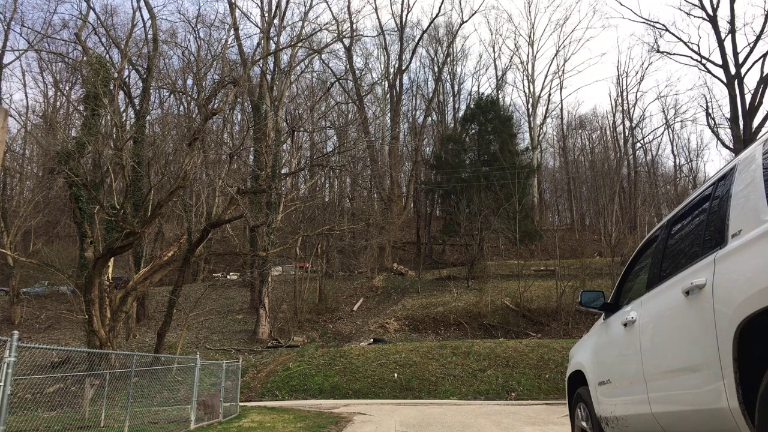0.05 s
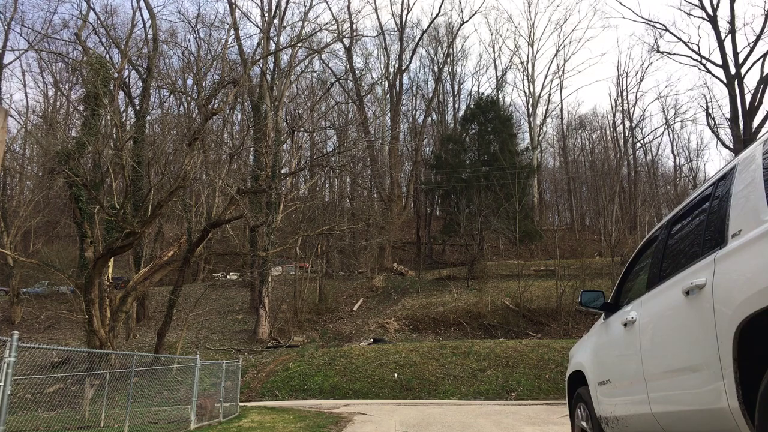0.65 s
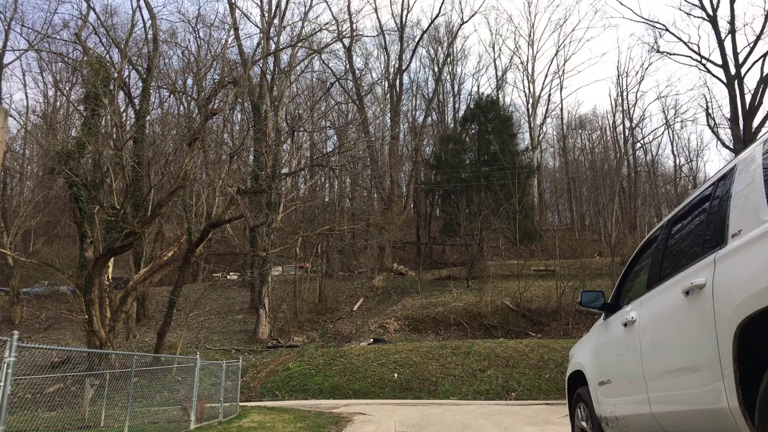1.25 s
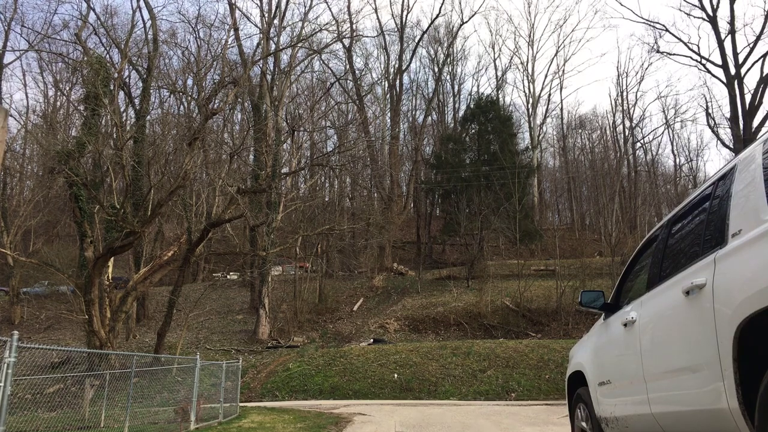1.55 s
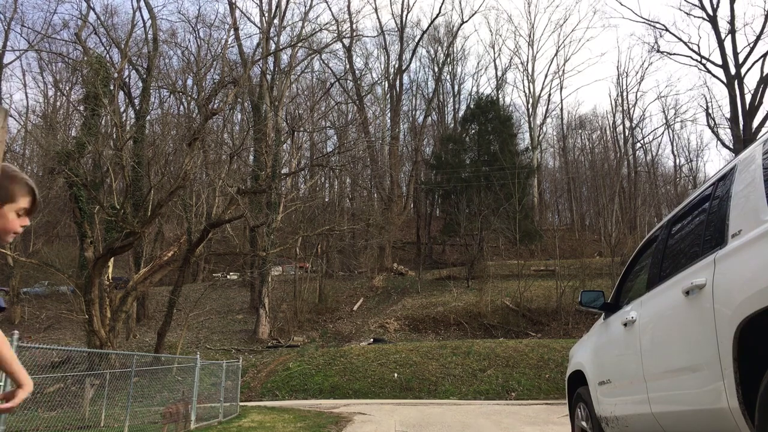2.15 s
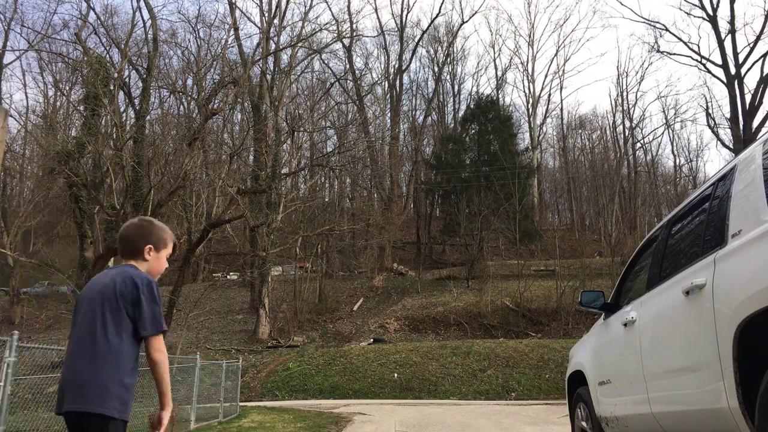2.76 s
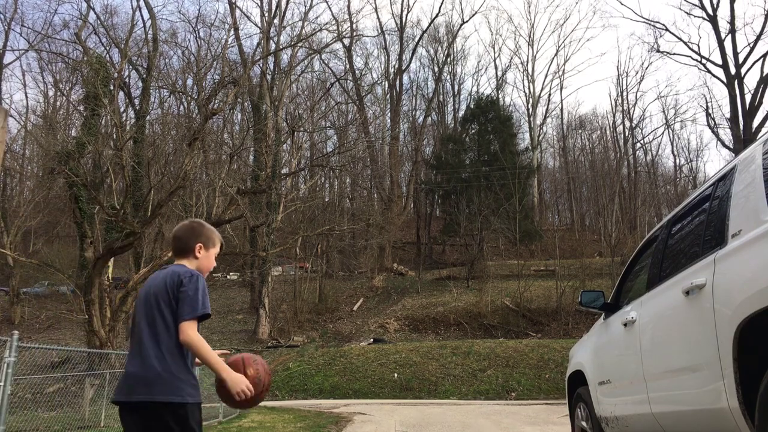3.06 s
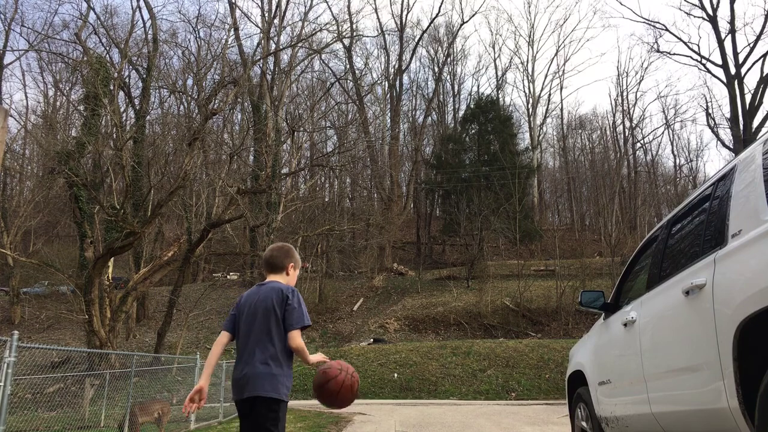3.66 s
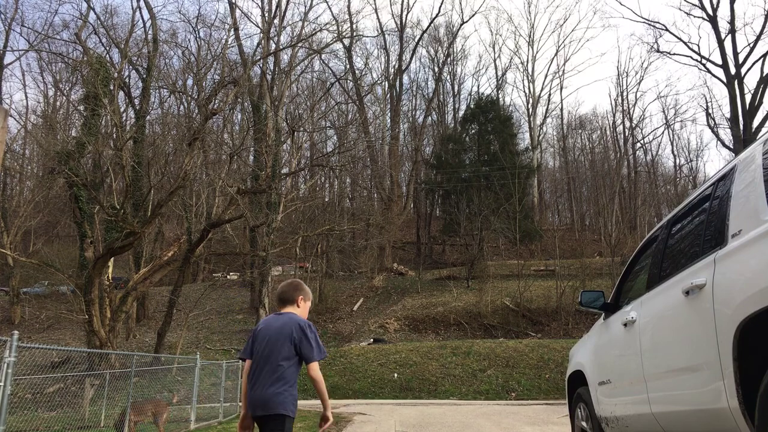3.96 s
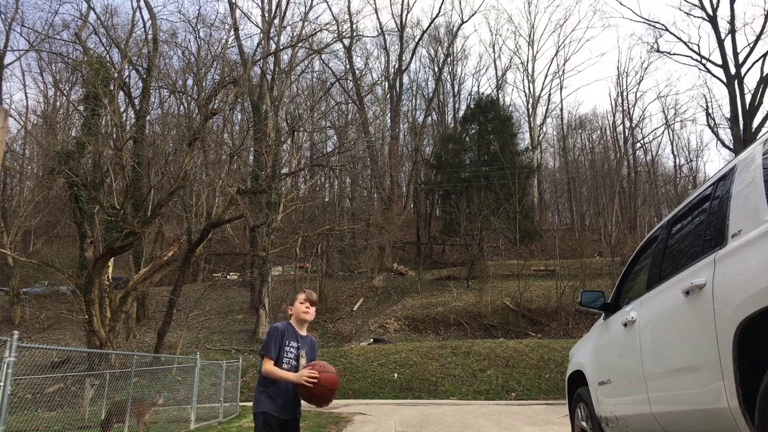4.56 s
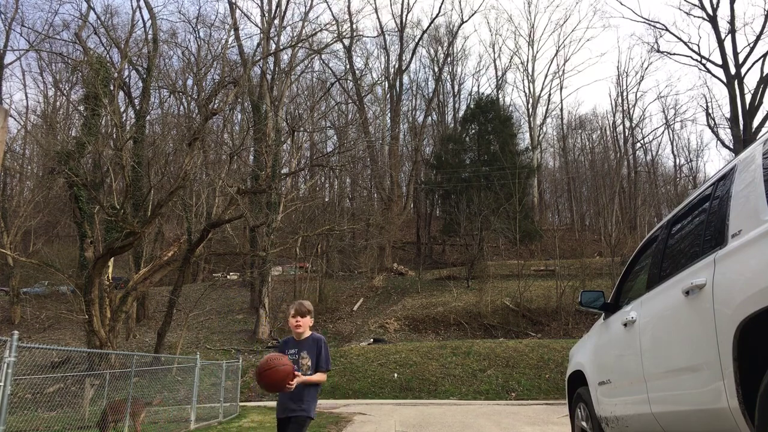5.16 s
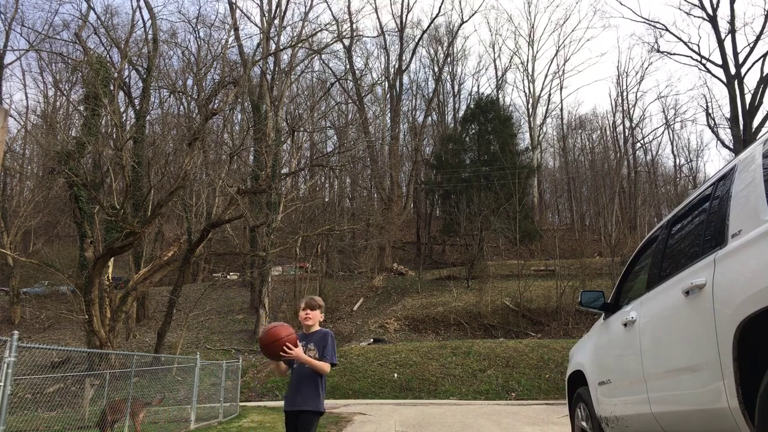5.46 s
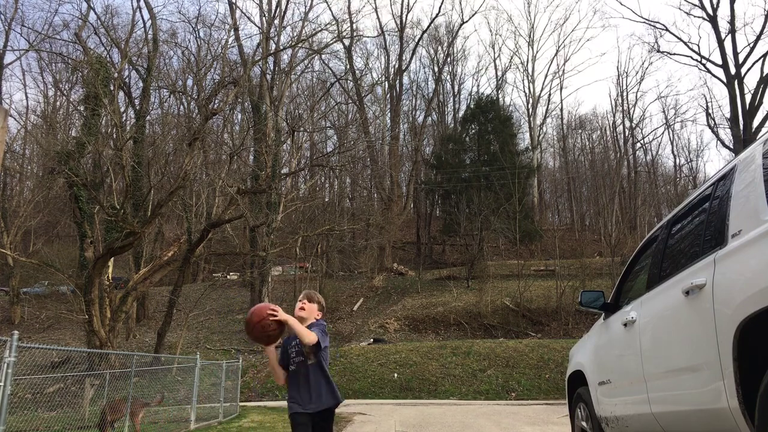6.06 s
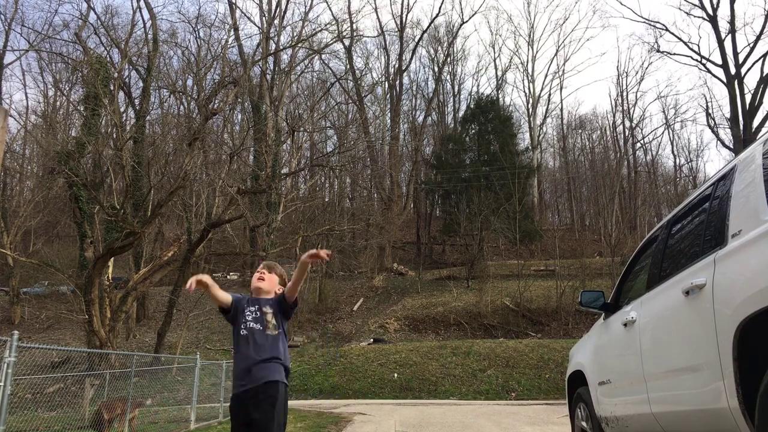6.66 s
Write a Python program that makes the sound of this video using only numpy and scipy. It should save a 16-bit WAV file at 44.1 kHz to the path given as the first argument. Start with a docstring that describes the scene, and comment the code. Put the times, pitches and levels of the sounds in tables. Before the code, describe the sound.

A basketball bounces six times on concrete outdoors, followed by faint shoe scuffs, with three loud microphone bumps over distant traffic.

```python
"""A basketball is dribbled up a concrete driveway, caught and shot, heard on one microphone in the yard.
Each bounce slaps the ground, rings the air inside and flexes the shell; a parked car, fence and house
throw it back. Shoes scuff and hands brush the ball. Far traffic hums under a hiss that comes and goes,
with faint chirps and ticks. Three times the microphone is bumped: a light touch and crackle around
a pop that falls into a deep thud."""
import sys
import numpy as np
from scipy import signal
from scipy.fft import rfft, irfft, next_fast_len
from scipy.io import wavfile
from scipy.ndimage import map_coordinates

SR = 44100
rng = np.random.default_rng(int(sys.argv[2]) if len(sys.argv) > 2 else 0)


def digitize_waveform(pressure):
    """Quantize a signal to 16-bit integers and store it at the path in sys.argv[1].

    Rows of a 2-D input are taken as channels; values are limited to [-1, 1].
    """
    field = np.atleast_2d(pressure).T
    bounded = np.clip(field, -1, 1)
    quanta = np.round(bounded * 32767).astype(np.int16)
    wavfile.write(sys.argv[1], SR, quanta)


N = 300762
TIME = np.arange(N) / SR

# bumps on the microphone: time_s, pop_db, thud_vs_pop_db, softness_s, touch_ahead_s, touch_db,
# crackle_ahead_s, crackle_length_s, crackle_db, hiss_dip_db, traffic_dip_db
BUMPS = [(2.2647, -4.5, 0, 0.0053, .0128, -9.5, 0.0037, 0.0056, -10.5, 8.5, -1),
         (6.357, -.5, -2.5, .000092, 0.0045, -11, .0125, .011, -22, 3.5, 14),
         (6.7566, 1.5, -10.5, 0.000094, .0051, -8.5, .0045, .01, -17, 7.5, 1.5)]


def amp(db):
    """Decibels to gain."""
    return 10 ** (np.asarray(db) / 20)


def unit(x):
    """x at rms 1."""
    return x / np.sqrt(np.mean(x ** 2) + 1e-20)


def along(points, hz):
    """(frequency_hz, value) points read on a log axis."""
    knots_hz, values = np.transpose(points)
    return np.interp(np.log(hz + 1), np.log(knots_hz + 1), values)


def add(track, start_s, x):
    """Mix x into the track from start_s on."""
    part = track[max(round(start_s * SR), 0):][:len(x)]
    part += x[:len(part)]


def filtered(x, response):
    """x shaped by a gain that depends on frequency."""
    size = next_fast_len(len(x) + 8192)
    return irfft(rfft(x, size) * response(np.fft.rfftfreq(size, 1 / SR)), size)[:len(x)]


def dull(x, cut_hz):
    """Second-order low-pass."""
    return signal.lfilter(*signal.butter(2, cut_hz, fs=SR), x)


def resonate(x, pitch_hz, width):
    """x through one steep resonance, at rms 1; width is a share of the pitch."""
    peak = signal.iirpeak(pitch_hz, 1 / width, fs=SR)
    return unit(signal.lfilter(*peak, signal.lfilter(*peak, x)))


def wobble(rate_hz):
    """A smooth random curve with rate_hz knots a second."""
    return map_coordinates(rng.standard_normal(int(N * rate_hz / SR) + 4), [TIME * rate_hz])


def noise(spectrum, size=N):
    """Coloured noise at rms 1."""
    return unit(filtered(rng.standard_normal(size), lambda hz: amp(along(spectrum, hz))))


def grains(spectrum, spread_db):
    """Dense tiny clicks of unequal size, at rms 1."""
    clicks = rng.standard_normal(N) * amp(spread_db * np.clip(rng.standard_normal(N), -2, 2))
    return unit(filtered(clicks, lambda hz: amp(along(spectrum, hz))))


def swell(peak_s, rise_s, fall_s):
    """An envelope that grows to 1 at peak_s and dies away."""
    return np.exp(-np.minimum(np.maximum((peak_s - TIME) / rise_s, (TIME - peak_s) / fall_s), 20))


def held(start_s, end_s, rise_s, fall_s):
    """An envelope that rises to 1 by start_s, holds until end_s and dies away."""
    return swell(np.clip(TIME, start_s, end_s), rise_s, fall_s)


def stroke(t, length_s, rise_share=.35):
    """The envelope of one rub: it presses on until t = 0, then lets go."""
    return np.exp(-np.minimum(np.maximum(-t / rise_share, t / (1 - rise_share)) / length_s, 20))


def dip(start_s, depth_db, recover_s, sink_s=0.028):
    """A gain that sinks just after start_s, stays low and comes back to 1."""
    age = np.maximum(TIME - start_s, 0)
    return amp(-depth_db * np.minimum(age / sink_s, 1) * np.exp(-(age / recover_s) ** 3))


def hiss():
    """A smooth hiss that comes in spells over a faint floor and dips after each bump."""
    hiss_spells = [(-1, 2.74), (6, 8)]  # when it is up: start_s, end_s
    hiss_colour = [(500, 1.5), (1500, 0), (3000, -5.5), (5500, -9.5), (8000, -13), (9600, -14.5),
                   (10400, -21.5), (11300, -16), (15500, -23.5)]  # its spectrum: frequency_hz, density_db
    floor_db, spell_db = -80.5, -54
    spells = sum(held(start, end, rise_s=0.02, fall_s=0.017) for start, end in hiss_spells)
    dips = np.prod([dip(time_s, depth_db, recover_s=0.5) for time_s, *_, depth_db, _ in BUMPS], axis=0)
    return (amp(floor_db) + amp(spell_db) * spells * dips) * noise(hiss_colour)


def traffic():
    """Far roads: rumble and tyre roar with one passing car; the level dips deeply at the second bump."""
    road_colour = [(20, -34.5), (40, -9), (80, 1.5), (112, -4.5), (207, -14), (354, -10), (430, -15),
                   (1100, -8.5), (1300, -15), (1750, -14.5), (2100, -29), (2700, -31), (3100, -42.5),
                   (15000, -67.5)]  # rumble of distant roads and town: frequency_hz, density_db
    tyre_colour = [(150, -56), (500, -15.5), (800, 2.5), (1000, 16.5), (1250, 2), (2000, -35),
                   (3200, -54.5)]  # tyre roar: frequency_hz, density_db
    step_s, ramp_s, fade_db_per_s = 2.37, .4, 0.48
    step = np.clip((TIME - step_s) / ramp_s + .5, 0, 1)
    fade_db = fade_db_per_s * np.maximum(TIME - step_s, 0)
    rumble_db = -51.5 + 6 * step - fade_db  # steps up once, then slowly draws away
    rumble = amp(rumble_db + 0.51 * wobble(9)) * noise(road_colour)
    steady_roar = amp(-54.5) * (1 - step) + amp(-60.5) * step
    passing_car = amp(-49.5) * swell(peak_s=2.85, rise_s=0.63, fall_s=0.16)
    tyres = np.hypot(steady_roar, passing_car) * amp(0.87 * wobble(3.3)) * noise(tyre_colour)
    dips = np.prod([dip(time_s, depth_db, recover_s=.27) for time_s, *_, depth_db in BUMPS], axis=0)
    return (rumble + tyres) * dips


def chirps():
    """Thin unsteady notes, far off, that barely rise over the hiss."""
    notes = [(1.265, 4500, -56, 0.012), (6.423, 4400, -59, 0.02), (6.69, 5300, -50, .002)]  # faint chirps: time_s, pitch_hz, level_db, half_length_s
    flutter = 1.6 * wobble(700)
    return sum(amp(db) * np.exp(-((TIME - time_s) / half_s) ** 2) * np.sin(2 * np.pi * hz * TIME + flutter)
               for time_s, hz, db, half_s in notes)


def ticks(count, first_s=.386, every_s=.394):
    """Tiny dry clicks at an even pace, all treble."""
    beats = sum(swell(first_s + k * every_s, rise_s=.0003, fall_s=.001) for k in range(count))
    return amp(-50) * beats * noise([(1500, -30), (5000, 4), (14000, -6.5)])


def pop(thud_db, life_s, softness_s):
    """A click that glides down to the microphone's lowest resonance."""
    thud_hz, glide_cycles = 31.6, 0.41
    t = np.arange(SR // 8) / SR
    cycles = thud_hz * t + glide_cycles * np.log1p(t / softness_s)  # a harder contact starts higher
    envelope = amp(thud_db * (1 - np.exp(-t / 0.0018))) * np.exp(-(t / life_s) ** 2)
    return envelope * np.cos(2 * np.pi * cycles)


def microphone_bumps():
    """Light rubs, and bumps, each a light touch and crackle around a pop that falls into a thud."""
    rubs = [(2.276, -31.5, 0.023), (6.243, -37, .003), (6.291, -46.5, 0.097)]  # light rubbing on the microphone: time_s, level_db, length_s
    rub_colour = [(60, -5), (300, 0.5), (750, 5), (1300, -2), (2600, -6.5), (4500, -15.5), (7000, -21.5),
                  (8500, -27), (15000, -34)]  # spectrum of that friction: frequency_hz, density_db
    touch_life_s, thud_life_s, crackle_fall_s = 0.0041, 0.021, .0012
    pops = np.zeros(N)
    slips = unit(amp(2.7 * wobble(350)))  # light rubbing comes in tiny jerks
    friction = slips * sum(amp(db) * stroke(TIME - time_s, length_s) for time_s, db, length_s in rubs)
    for (time_s, pop_db, thud_db, softness_s, touch_ahead_s, touch_db,
         crackle_ahead_s, crackle_length_s, crackle_db, _, _) in BUMPS:
        touch_s, crackle_s = time_s - touch_ahead_s, time_s - crackle_ahead_s
        life_s = thud_life_s + softness_s  # a soft contact lasts longer
        add(pops, touch_s, amp(touch_db) * pop(thud_db=-5, life_s=touch_life_s, softness_s=0.00014))
        add(pops, time_s, amp(pop_db) * pop(thud_db, life_s, softness_s))
        lead_in = amp(-13.5) * swell(crackle_s, rise_s=0.01, fall_s=crackle_fall_s)
        crackle = held(crackle_s, crackle_s + crackle_length_s, rise_s=0.0016, fall_s=crackle_fall_s)
        friction += amp(crackle_db) * (lead_in + crackle)
        friction += amp(touch_db - 14) * stroke(TIME - touch_s, touch_life_s)
    return friction * grains(rub_colour, spread_db=2.5) + dull(pops, cut_hz=7600)


def scuffs():
    """Soles on the driveway, palms on the ball: gritty friction over a dull knock and a resonant scrape."""
    contacts = [(3.083, -60.5, -44.5, .012, 1550), (3.114, -64.5, -47.5, .04, 1100),
                (3.93, -64, -49.5, .026, 400), (4.019, -61, -47.5, .045, 352),
                (4.235, -61.5, -46, 0.13, 814), (4.302, -59.5, -66, 0.069, 2480),
                (4.369, -60, -47, .058, 330), (4.444, -53, -53, 0.012, 2500),
                (4.514, -52.5, -39.5, 0.041, 2340), (4.675, -48.5, -45, 0.015, 1520),
                (5.096, -55, -48, 0.059, 554), (5.22, -64.5, -56, 0.031, 550),
                (5.602, -55.5, -47.5, 0.045, 460), (5.739, -61.5, -57, 0.026, 554),
                (6.091, -60.5, -47.5, 0.029, 396), (6.638, -43, -38.5, 0.0072, 700),
                (6.653, -48, -36.5, 0.015, 546)]  # each scuff or brush: time_s, grit_db, knock_db, length_s, scrape_hz
    grit_colour = [(200, -28), (900, -8), (1900, -7), (2500, 14.5), (3100, 7), (4300, 9), (5200, -1.5),
                   (8200, -8), (10000, -23), (15000, -25.5)]  # spectrum of the grit: frequency_hz, density_db
    sole_colour = [(100, -37), (320, 4.5), (550, 4), (900, 0), (1600, -2), (2500, -7), (3200, -25.5),
                   (8000, -40.5)]  # spectrum of the knock: frequency_hz, density_db
    grit_envelope, body = np.zeros((2, N))
    t = np.arange(-SR // 4, SR // 4) / SR
    for time_s, grit_db, knock_db, length_s, scrape_hz in contacts:
        press = stroke(t, length_s)
        scrape = amp(-4) * resonate(rng.standard_normal(len(t)), scrape_hz, width=0.29)
        knock = noise(sole_colour, size=len(t))
        add(grit_envelope, time_s + t[0], amp(grit_db) * press)
        add(body, time_s + t[0], amp(knock_db) * press * (knock + scrape))
    stick_slip = unit(amp(2.7 * wobble(170)))
    return grit_envelope * grains(grit_colour, spread_db=9.5) * stick_slip + body


def wall_reflections(direct):
    """The direct sound plus early returns off car, fence and house; paths change as the ball moves."""
    walls = [(.0042, -5), (.0075, -11.5), (0.0126, -10), (.019, -17), (.031, -23.5)]  # nearby hard surfaces: delay_s, level_db
    out = direct.copy()
    for (delay_s, db), shift in zip(walls, rng.standard_normal(len(walls))):
        add(out, delay_s * (1 + 0.065 * shift), amp(db) * direct)
    return out


def yard_echo(x, build_s=0.0037):
    """Diffuse echo of the yard; treble dies first."""
    decay_times = [(100, 0.22), (400, 0.21), (1500, 0.14), (4000, 0.14), (12000, 0.04)]  # the yard's reverberation: frequency_hz, t60_s
    hz, t, bands = signal.stft(rng.standard_normal(len(x)), SR, nperseg=256)
    decay = amp(-60 * t / along(decay_times, hz)[:, None])
    _, tail = signal.istft(bands * decay, SR, nperseg=256)
    tail *= 1 - np.exp(-np.arange(len(tail)) / SR / build_s)
    return signal.fftconvolve(x, tail / np.linalg.norm(tail))[:len(x)]


def ring(modes, t, scatter_db, detune):
    """Damped modes, struck a little differently each time."""
    chance = rng.standard_normal((len(modes), 2))
    return sum(amp(db - scatter_db * softer - 60 * t / t60_s)
               * np.sin(2 * np.pi * hz * (1 + detune * sharper) * t)
               for (hz, db, t60_s), (softer, sharper) in zip(modes, chance))


def dribble():
    """Each bounce slaps the concrete, rings the air in the ball and flexes its shell."""
    # ball on concrete: start_s, boom_db, shell_db, slap_db, smack_hz, cut_hz, air_ring_db, echo_db
    bounces = [(0.399, -39.5, -28.5, -36, 1140, 1440, -14, 2),
               (0.9081, -19, -16, -22.5, 1376, 2370, -0.5, -7.5),
               (1.6358, -20.5, -20, -24.5, 1560, 2960, -8, -11),
               (2.9269, -19.5, -12, -17.5, 1082, 2520, -7, -11),
               (3.5124, -19, -17, -20, 1413, 4930, -0.5, -9),
               (4.1213, -17.5, -17.5, -19, 1297, 4000, -6.5, -12)]
    slap_colour = [(100, -2.5), (300, 0), (550, -0.5), (900, -1), (1400, 2), (2200, -3), (3000, -7),
                   (4600, -11.5), (5400, -23), (8000, -32.5), (15000, -28.5)]  # rubber slapping the ground: frequency_hz, density_db
    air_modes = [(1040, -16.5, 0.11), (1694, -3, 0.059), (2190, -14.5, 0.015), (2555, -7, 0.02),
                 (3590, -25.5, 0.1), (4730, -15.5, 0.017)]  # the air ringing inside the ball: pitch_hz, level_db, t60_s
    shell_modes = [(144, -3, 0.12), (264.4, 1, 0.059), (353.3, -7, 0.09)]  # the shell flexing: pitch_hz, level_db, t60_s
    boom_modes = [(91.3, 5, 0.12)]  # the whole ball squashing: pitch_hz, level_db, t60_s
    peel_t60_s, smack_t60_s = .026, 0.025
    out, t = np.zeros(N), np.arange(SR // 3) / SR
    contact = 1 - np.exp(-t / .0002)
    peel = amp(-60 * t / peel_t60_s)  # the pebbled skin peels on and off the ground
    flatten = 1 - np.exp(-(t / 0.0048) ** 2)  # the ball swings fully only once it has flattened
    for start_s, boom_db, shell_db, slap_db, smack_hz, cut_hz, air_ring_db, echo_db in bounces:
        crack = amp(-20) * unit(noise(slap_colour, size=len(t)) * peel)
        smack = amp(-60 * t / smack_t60_s) * np.sin(2 * np.pi * smack_hz * t)  # the landing patch rings
        ping = amp(air_ring_db) * ring(air_modes, t, scatter_db=3, detune=0.0092)
        direct = amp(slap_db) * dull((crack + smack + ping) * contact, cut_hz)  # a soft bounce is duller
        slap = wall_reflections(direct)
        boom = amp(boom_db) * ring(boom_modes, t, scatter_db=0.9, detune=.01)
        shell = amp(shell_db) * ring(shell_modes, t, scatter_db=0.5, detune=0.028)
        thump = (boom + shell) * flatten
        echo = amp(echo_db) * yard_echo(amp(-1.5) * slap + amp(-10) * thump)
        add(out, start_s, slap + thump + echo)
    return signal.lfilter(*signal.butter(2, 45, "high", fs=SR), out)  # a small ball radiates no deep bass


def scene():
    """The driveway and the far roads at one microphone."""
    return (dribble() + scuffs() + microphone_bumps() + traffic() + hiss() + chirps() + ticks(count=5))[None]


def record(dry):
    """The recorder clips at full scale and keeps nothing above its band limit."""
    top_hz = 15850
    return filtered(np.clip(dry[0], -1, 1), lambda hz: hz < top_hz)[None]


dry = scene()
out = record(dry)
digitize_waveform(out)
```